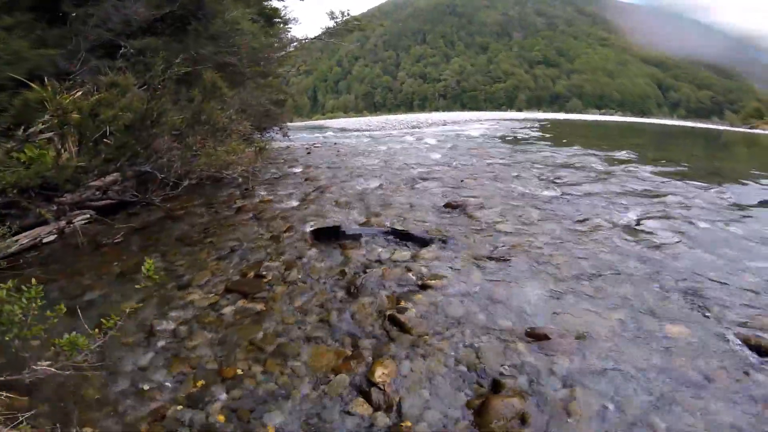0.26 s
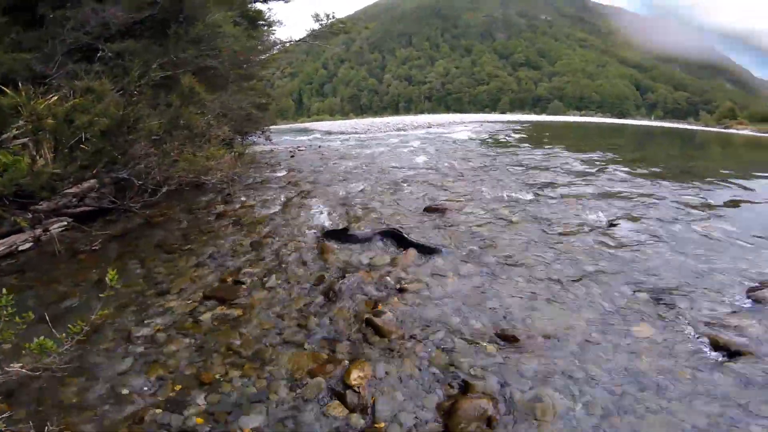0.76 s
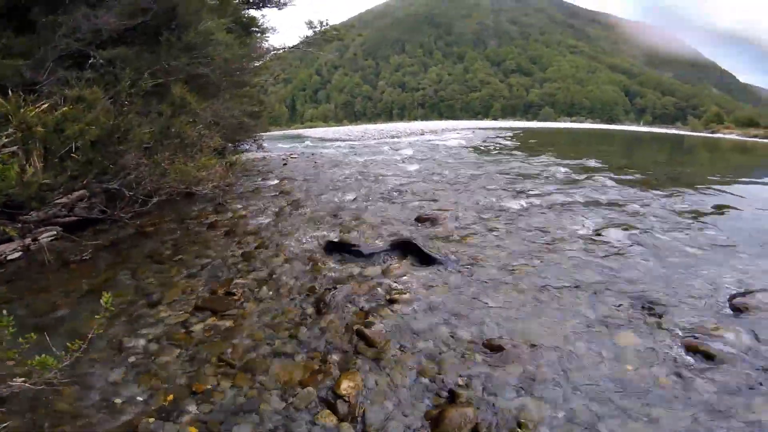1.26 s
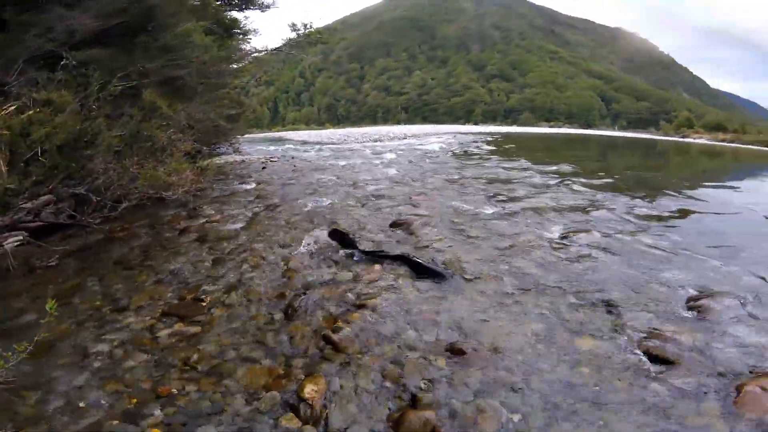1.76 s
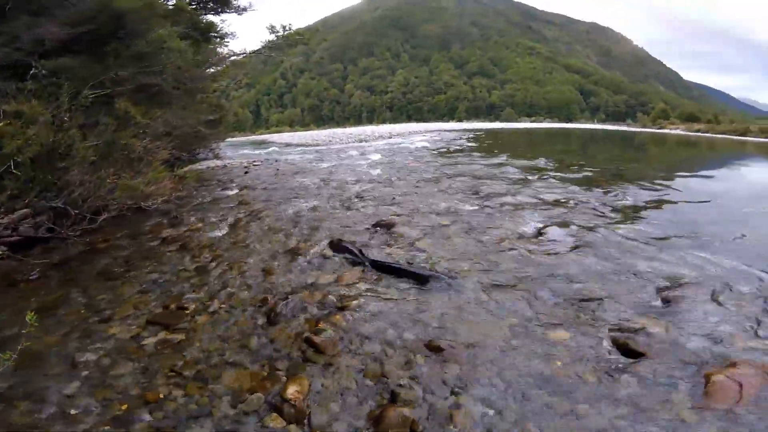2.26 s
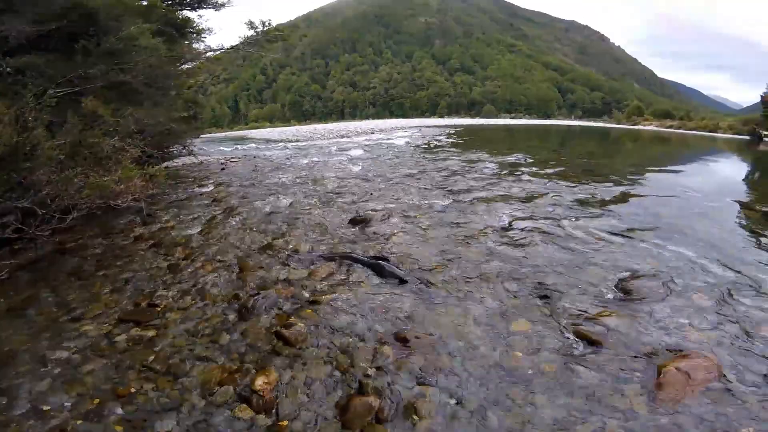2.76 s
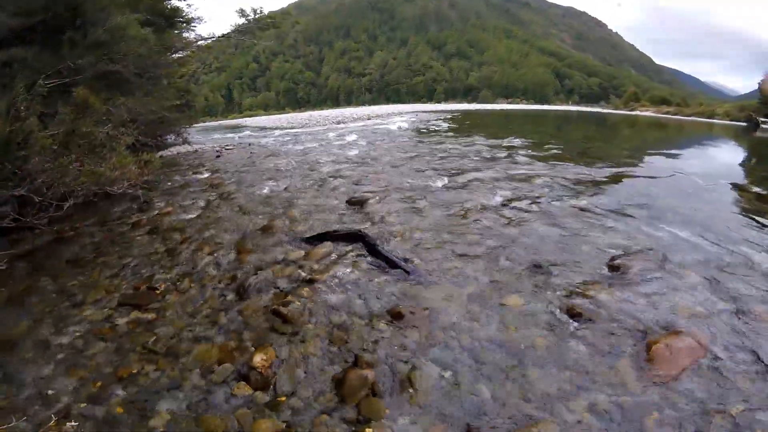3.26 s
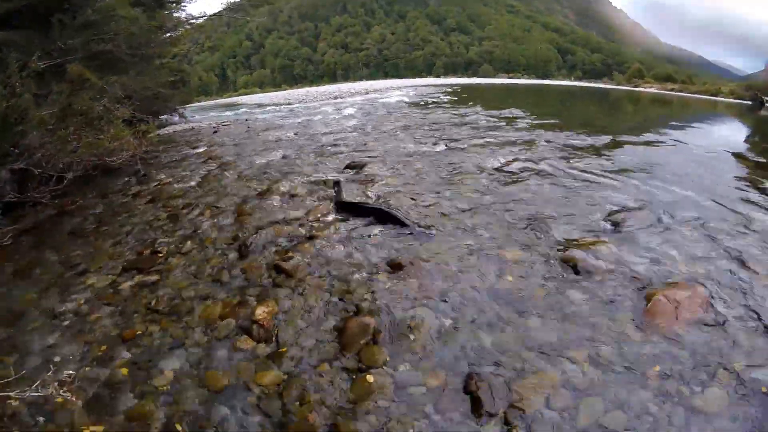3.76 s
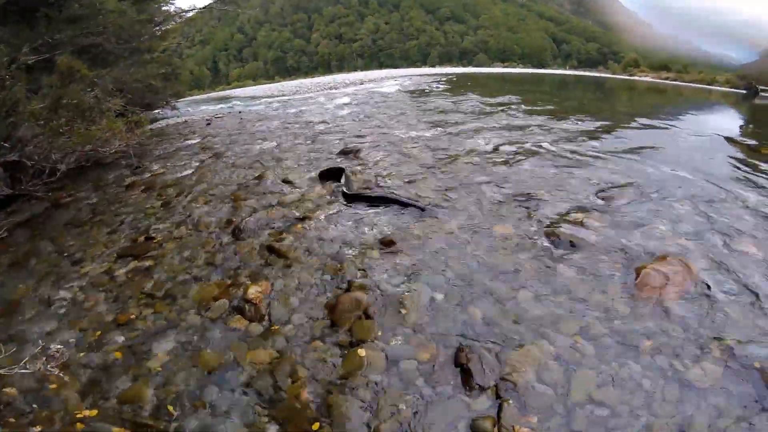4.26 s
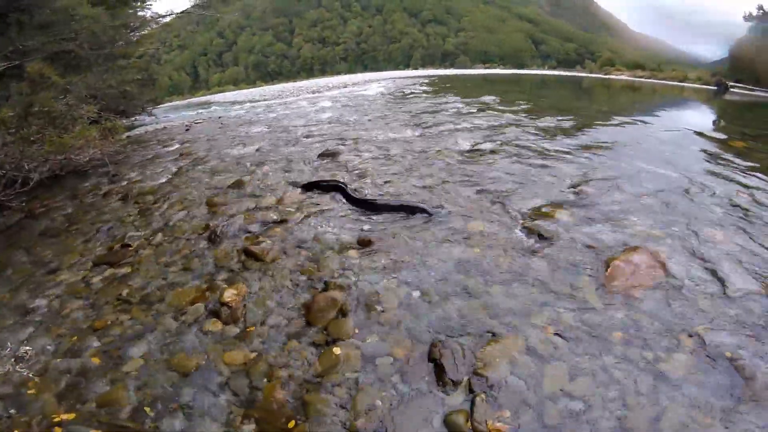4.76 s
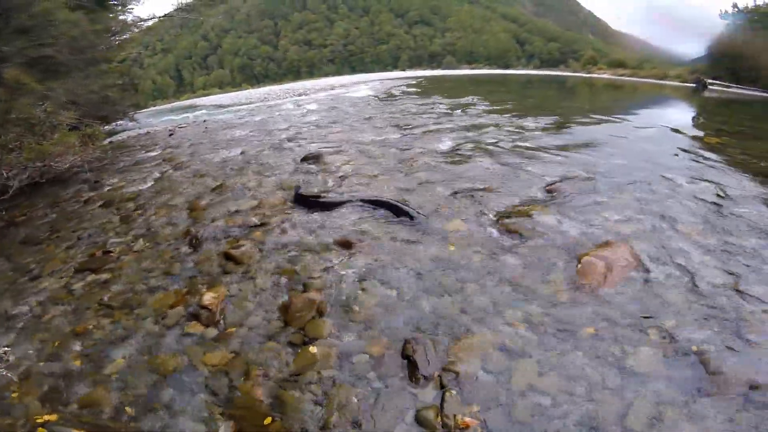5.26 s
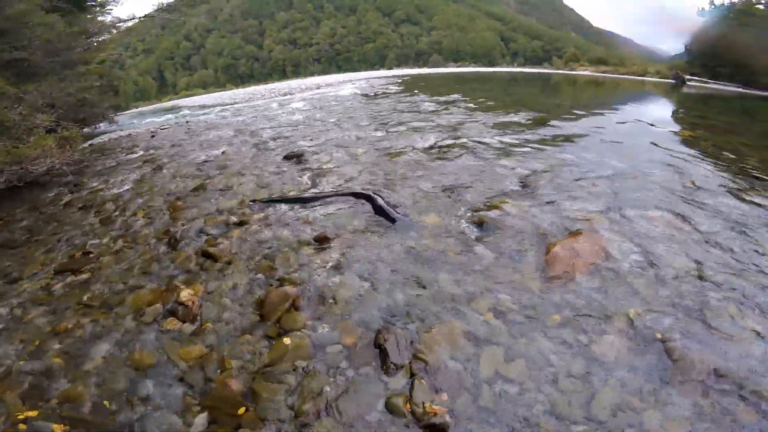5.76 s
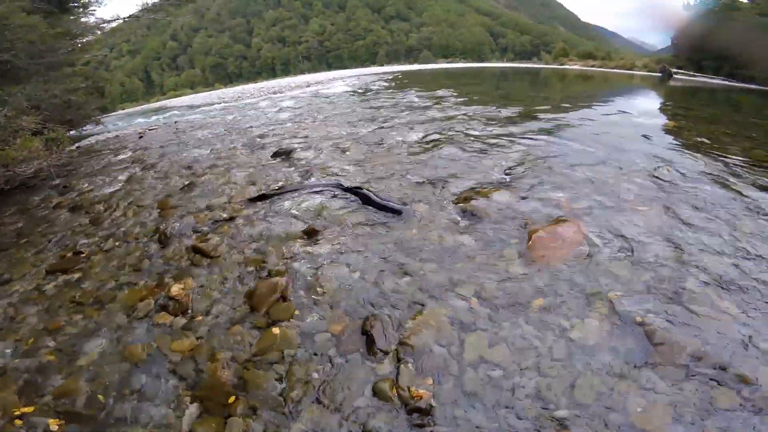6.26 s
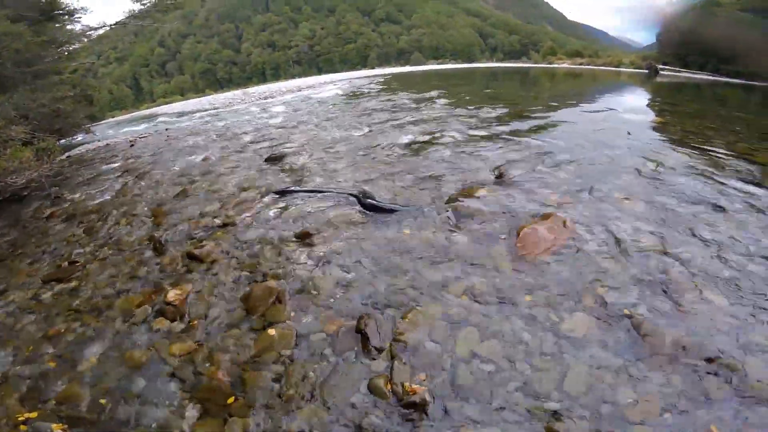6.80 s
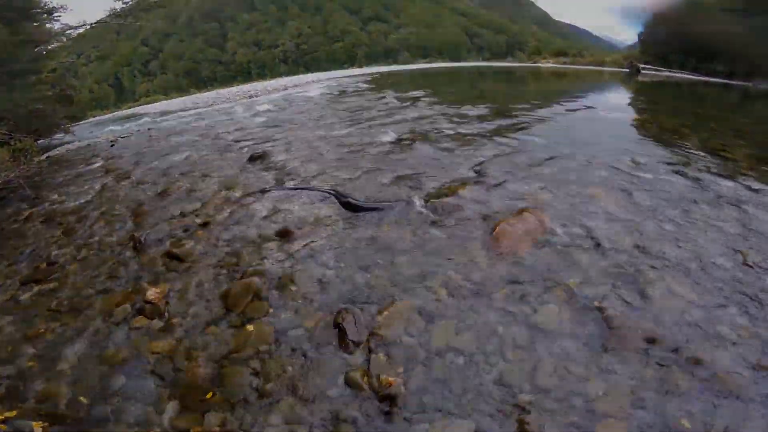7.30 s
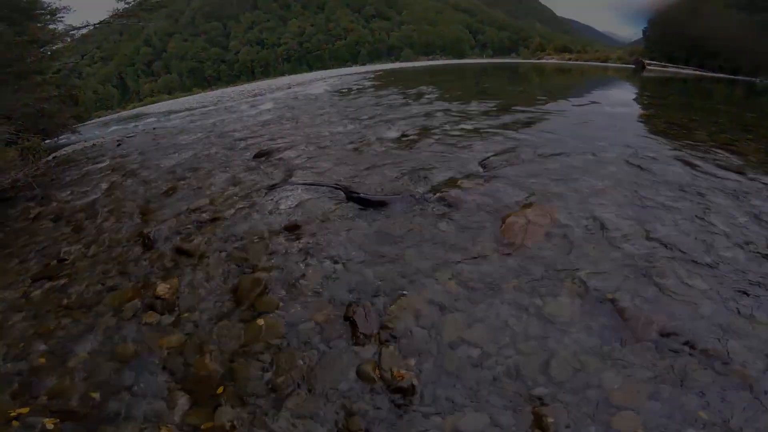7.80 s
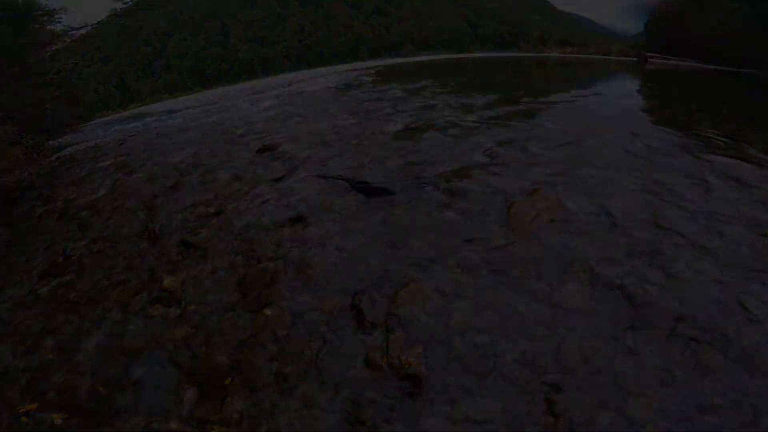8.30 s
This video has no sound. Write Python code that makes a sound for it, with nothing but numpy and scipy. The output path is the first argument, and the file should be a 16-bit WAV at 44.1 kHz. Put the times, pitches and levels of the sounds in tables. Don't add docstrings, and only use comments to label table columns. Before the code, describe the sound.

Muffled water gurgles and plops over pebbles with small clicks, while low bumps and rubs of a hand-held housing come and go before a fade-out.

```python
import sys
import numpy as np
from scipy import signal
from scipy.fft import rfft, irfft, next_fast_len
from scipy.io import wavfile
from scipy.ndimage import uniform_filter1d

SR = 44100
rng = np.random.default_rng(int(sys.argv[2]) if len(sys.argv) > 2 else 0)


def wav_record(signal):
    frames = np.transpose(np.atleast_2d(signal))
    bounded = np.clip(frames, -1, 1)
    quanta = np.round(bounded * 32767).astype(np.int16)
    wavfile.write(sys.argv[1], SR, quanta)


def volts_from_decibels(level):
    exponent = np.asarray(level, float) / 20
    return 10 ** exponent


N = 376613
TIME = np.arange(N) / SR
PAD = next_fast_len(N + SR)

# frequency in Hz, level in dB per Hz.
HOUSING = [(55, -31), (100, -21), (190, -11), (330, -7.5), (1100, -7), (1400, -6), (1760, -0.5), (1950, -4),
           (2300, -13.5), (2800, -19), (3350, -21), (3700, -33.5), (4090, -50.5), (6000, -100)]
# frequency in Hz, width in Hz.
BODY = [
    (28, 12.6),
    (62, 19),
    (123, 27),
]
FADE_FROM_S, FADE_TO_S = 6.885, 8.72


def rms_one(x):
    return x / np.sqrt(np.mean(x ** 2) + 1e-20)


def at_hz(points, hz):
    table_hz, table_db = np.array(points).T
    return np.interp(np.log(hz), np.log(table_hz), table_db)


def colour(x, spectrum):
    hz = np.arange(PAD // 2 + 1) * SR / PAD + 1
    cepstrum = irfft(np.log(volts_from_decibels(at_hz(spectrum, hz))), PAD)
    cepstrum[1:PAD // 2] *= 2
    cepstrum[PAD // 2 + 1:] = 0
    response = np.exp(rfft(cepstrum))
    return irfft(rfft(x, PAD) * response, PAD)[:N]


def drift(rate_hz):
    hop = 40
    r = np.exp(-2 * np.pi * rate_hz * hop / SR)
    noise = rng.standard_normal(N // hop + 2002)
    slow = signal.lfilter([1], [1, -2 * r, r * r], noise)[2000:]
    return np.interp(np.arange(N) / hop, np.arange(len(slow)), rms_one(slow))


def resonance(x, hz, width_hz):
    r = np.exp(-np.pi * width_hz / SR)
    return signal.lfilter([1, 0, -1], [1, -2 * r * np.cos(2 * np.pi * hz / SR), r * r], x + 1e-18)


def stream():
    # time in seconds, water level in dB.
    flow = [
        (0, -35),
        (1.2, -35.5),
        (2, -35),
        (4.2, -35.5),
        (4.7, -35),
        (5, -35.5),
        (5.9, -36),
        (6.9, -36),
        (8.54, -36),
    ]
    # middle in seconds, treble lift in dB.
    splashes = [
        (.12, 4.5),
        (.495, 1),
        (.63, 3),
        (.81, 4),
        (.9, 5),
        (1.94, 9.5),
        (4.73, -0.5),
        (7.37, -1),
    ]
    splash_s, bright_hz = 0.013, 2340
    bubble_share_db = -5
    water = rush(patchy_db=0.87, surge_db=0.21)
    water = water + volts_from_decibels(bubble_share_db) * bubbles(spread_db=1.5, clump_db=2.0)
    water = rms_one(colour(water, HOUSING))
    high_pass = signal.butter(2, bright_hz, "high", fs=SR, output="sos")
    treble = signal.sosfiltfilt(high_pass, water)
    bright_db = sum(lift_db * np.exp(-((TIME - s) / splash_s) ** 2) for s, lift_db in splashes)
    water_db = np.interp(TIME, *np.transpose(flow))
    return volts_from_decibels(water_db) * (water + treble * (volts_from_decibels(bright_db) - 1))


def rush(patchy_db, surge_db):
    out = 0
    surge = drift(5.0)
    edges = 60 * 2 ** (np.arange(20) / 3)
    white = rng.standard_normal((2, N))
    for k, (low, high) in enumerate(zip(edges, edges[1:])):
        band_pass = signal.butter(2, [low, high], "band", fs=SR, output="sos")
        band = signal.sosfilt(band_pass, white[k % 2])
        out = out + band * volts_from_decibels(surge_db * surge + patchy_db * drift(4.6))
    return rms_one(out)


def bubbles(spread_db, clump_db):
    births_per_s, ring_cycles = 900, 7.9
    sizes = volts_from_decibels(spread_db * np.minimum(rng.exponential(1, N), 4)) * rng.choice([-1, 1], N)
    born = rng.random(N) < births_per_s * volts_from_decibels(clump_db * drift(8.0)) / SR
    pitches = np.geomspace(280, 4200, 28)
    number = pitches ** 0.5
    dealt = rng.choice(28, N, p=number / np.sum(number))
    out = 0
    for k, hz in enumerate(pitches):
        ring = resonance(sizes * born * (dealt == k), hz, 1.95 * hz / ring_cycles)
        out = out + hz ** 0.79 * rms_one(ring) / np.sqrt(hz ** 0.5)
    return rms_one(out)


def plops():
    # start in seconds, peak behind the housing in dB, pitch in Hz.
    near = [(0.075, -21, 1900), (0.209, -33, 2760), (0.312, -26, 870), (0.317, -22, 1900),
            (0.431, -20, 1900), (0.671, -23, 1690), (0.689, -27, 1840), (0.73, -22, 1750),
            (0.767, -21, 1740), (0.941, -31, 454), (1.184, -25, 760), (1.888, -21, 1740),
            (1.813, -21.5, 1400), (1.996, -26, 690), (3.079, -34, 2620), (3.376, -23, 1610),
            (3.811, -23.5, 1600), (3.889, -33, 2370), (4.059, -28, 1180), (4.716, -22, 2150),
            (4.911, -21, 1890), (5.522, -31, 676), (6.005, -30.5, 376), (6.075, -20.5, 1725),
            (6.084, -26, 1350), (6.533, -24, 1880), (6.693, -24.5, 655), (6.774, -27, 1270),
            (7.161, -27, 1610), (7.412, -27, 473)]
    small_count, small_db, small_spread_db = 48, -22, 2.5
    small_low_hz, small_top_hz = 2305, 4030
    cycles, pitch_rise = 1.5, 0.033
    when, size, pitch = rng.random((small_count, 3)).T
    small_hz = small_low_hz + pitch * (small_top_hz - small_low_hz)
    small_peak_db = small_db + small_spread_db * (2 * size - 1) + at_hz(HOUSING, small_hz)
    small = zip(when * (N - 1) / SR, small_peak_db, small_hz)
    out, t = np.zeros(N + 2000), np.arange(2000) / SR
    for s, peak_db, hz in [*near, *small]:
        life = t / (0.0021 + cycles / hz / 2)
        tone = np.sin(2 * np.pi * hz * t * (1 + pitch_rise * (life / 2 - 1)))
        source_db = peak_db - at_hz(HOUSING, hz) - 5.0
        out[round(s * SR):][:2000] += volts_from_decibels(source_db) * life * np.exp(1 - life) * tone
    return colour(out[:N], HOUSING)


def ticks():
    # start in seconds, peak in dB, centre in Hz.
    clicks = [(.657, -20.5, 1800), (1.1835, -19.5, 1300), (1.949, -24, 2210), (1.974, -19.5, 1900),
              (2.061, -23, 1900), (3.046, -24, 1700), (3.262, -21, 1600), (6.06, -30, 1700),
              (6.379, -29, 1800), (6.693, -27, 780), (6.698, -23, 605)]
    out, impulse = np.zeros(N + 2000), np.arange(2000) == 0
    housing = colour(np.arange(N) == 0, HOUSING)[:2000]
    for s, peak_db, hz in clicks:
        strike = resonance(resonance(impulse, hz, 0.8 * hz), hz, 0.8 * hz)
        shape = signal.fftconvolve(housing, strike)[:2000]
        out[round(s * SR):][:2000] -= volts_from_decibels(peak_db) * shape / np.max(np.abs(shape))
    return out[:N]


def handling():
    slips_per_s = 35.0
    slips = (rng.random(N) < slips_per_s / SR) * rng.standard_normal(N)
    out = 0
    for (hz, width_hz), level in zip(BODY, hand_levels()):
        rub = rng.standard_normal(N) + volts_from_decibels(3.0) * rms_one(slips)
        ring = resonance(resonance(rub, hz, 1.12 * width_hz), hz, 1.12 * width_hz)
        ring = rms_one(ring)
        swing = np.sqrt(uniform_filter1d(ring ** 2, int(4.0 * SR / hz)) + 0.17)
        out = out + level * rms_one(ring / swing)
    return out


def hand_levels():
    # middle in seconds, length in seconds, peak in dB.
    sways = [(0, 0.04, -33), (0.177, 0.071, -40), (0.497, 0.24, -39.5), (.93, 0.17, -38.5),
             (1.3, 0.16, -38.5), (1.48, .08, -37), (1.698, .22, -44), (2, .15, -52), (2.2, 0.11, -38),
             (2.35, 0.07, -35.5), (2.533, .14, -41), (2.848, 0.3, -35.5), (3.144, 0.26, -49),
             (3.42, .2, -38.5), (3.78, 0.26, -38), (4.11, 0.063, -36), (4.31, 0.17, -36.5),
             (4.58, .12, -38), (4.82, 0.078, -38), (5.09, .14, -46), (5.29, 0.092, -41), (5.74, .2, -44),
             (5.94, .07, -41), (6.15, 0.12, -43), (6.38, 0.082, -38), (6.56, 0.22, -45), (6.853, 0.23, -44),
             (7.303, 0.37, -39.5), (7.898, 0.34, -41), (8.44, .1, -37)]
    # start in seconds, hold in seconds, level in dB, upper mode against it in dB.
    rubs = [(0, 0.03, -45, -22), (.23, 0.039, -51, -10), (.46, .07, -54.5, 0), (.88, .03, -60, 4),
            (1.27, .05, -40.5, -6.5), (1.42, 0.049, -34.5, -23), (1.57, 0.16, -45.5, -10),
            (2.06, 0.13, -36, -10), (2.29, 0.061, -46, -2.5), (2.67, 0.066, -38.5, -2.5),
            (2.8, 0.14, -39, -12), (3.02, 0.054, -37.5, -6.5), (3.27, 0.049, -53, 5.5),
            (3.38, 0.1, -41.5, -12), (3.6, 0.25, -46, -12), (3.98, 0.037, -48.5, -8), (4.17, 0.15, -50, -5),
            (4.63, .02, -37.5, -14), (4.85, 0.079, -51, -5), (5.2, .04, -58, 1), (5.44, .04, -59, -3),
            (6.13, 0.17, -52, -7.5), (6.36, 0.046, -48, -2), (6.7, 0.025, -44, -23), (6.84, 0.018, -46, -8),
            (7.02, 0.078, -54.5, 0), (7.23, 0.032, -49.5, 3.5), (7.7, .15, -56.5, -3),
            (8.48, 0.045, -44, 0)]
    rest = [
        -48.5,
        -57,
        -62.5,
    ]
    attack_db_per_s, release_db_per_s, rest_wander_db = 459, 192, 1.5
    t = np.arange(0, N + 64, 64) / SR
    sway = sum(volts_from_decibels(db) * np.exp(-(2 * (t - s) / length) ** 2) for s, length, db in sways)
    lower, upper = 0, 0
    for s, held, db, upper_db in rubs:
        rise_db = attack_db_per_s * np.maximum(s - t, 0)
        fall_db = release_db_per_s * np.maximum(t - s - held, 0)
        shape_db = db - rise_db - fall_db
        lower = lower + volts_from_decibels(shape_db)
        upper = upper + volts_from_decibels(shape_db + upper_db)
    levels = []
    for drive, rest_db in zip((sway, lower, upper), rest):
        still = volts_from_decibels(rest_db + rest_wander_db * drift(5.2))
        levels.append(np.hypot(np.interp(TIME, t, drive), still))
    return levels


def bumps():
    # start in seconds, peak in dB, upper mode share in dB.
    knocks = [(0.519, -32, -11), (1.288, -43, -9), (1.429, -26, -13), (1.57, -35, -5), (2.063, -30, -2),
              (2.27, -34, -15), (2.679, -30, -10), (2.811, -35, -5), (2.95, -25.5, -13), (3.028, -32, -2),
              (3.381, -34, -8), (4.34, -42, 3), (4.616, -36, -4), (7.009, -42, 4), (7.236, -44, -2)]
    s, peak_db, upper_db = np.transpose(knocks)
    push = signal.butter(2, 220.0, fs=SR, output="sos")
    out = 0
    for (hz, width_hz), share_db in zip(BODY[1:], (0 * s - 6.0, upper_db)):
        clicks = np.zeros(N)
        clicks[np.round(s * SR).astype(int)] = volts_from_decibels(peak_db + share_db) * SR / (4 * np.pi * hz)
        ring = resonance(signal.sosfilt(push, clicks), hz, 0.56 * width_hz)
        out = out + 2 * np.pi * hz / SR * ring
    return out


def hiss():
    # frequency in Hz, level in dB per Hz.
    port = [(3300, -52.5), (4090, -32), (4200, -14), (4600, -16.5), (5900, -12.5), (6250, -8.5), (6470, -1),
            (7000, -7.5), (9000, -10), (9800, -13), (10400, -16.5), (11500, -14), (12800, -17.5),
            (14200, -28)]
    return volts_from_decibels(-64.3) * rms_one(colour(rng.standard_normal(N), port))


def fade(s):
    return np.clip((FADE_TO_S - s) / (FADE_TO_S - FADE_FROM_S), 1e-3, 1)


def line_gate(x):
    # frequency in Hz, threshold over the usual level in dB.
    threshold = [(3500, -32), (3850, 3.5), (4100, 1.5), (4500, 3.5), (5200, 2), (6000, 1.5), (6350, -8),
                 (7500, -5.5), (8500, -0.5), (9500, 1.5), (10400, 3), (11500, 2.5), (13000, 2.5),
                 (14200, 2)]
    # fade in dB, limit in Hz.
    top_steps = [
        (-2.2, 13700),
        (-7, 12900),
    ]
    # start in seconds, end in seconds.
    drops = [
        (5.1, 5.33),
        (5.5, 5.7),
        (5.68, 5.3),
        (6.11, 6.3),
        (6.2, 5.8),
        (6.478, 6.95),
        (7.203, 6.5),
        (7.451, 7.7),
    ]
    drop_low_hz, drop_top_hz = 4020, 4480
    flicker_db, follows_fade = -0.5, 0.97
    frame = dict(fs=SR, window="cosine", nperseg=2048, noverlap=1024)
    hz, s, lines = signal.stft(x, **frame)
    before_fade = lines[:, s < 6]
    usual = np.sqrt(np.mean(np.abs(before_fade) ** 2, axis=1, keepdims=True))
    fade_db = 20 * np.log10(fade(s))
    flicker = np.repeat(rng.standard_normal((65, len(s))), 16, axis=0)[:len(hz)]
    limit_db = at_hz(threshold, hz + 1)[:, None] + flicker_db * flicker + follows_fade * fade_db
    keep = np.abs(lines) > usual * volts_from_decibels(limit_db)
    for below_db, top_hz in top_steps:
        keep[np.ix_(hz > top_hz, fade_db < below_db)] = False
    quiet_band = (hz > drop_low_hz) & (hz < drop_top_hz)
    for start_s, end_s in drops:
        keep[np.ix_(quiet_band, (s > start_s) & (s < end_s))] = False
    ungated = hz[:, None] < threshold[0][0]
    return signal.istft(lines * (keep | ungated), **frame)[1][:N]


def scene():
    return (stream() + plops() + ticks() + handling() + bumps() + hiss())[None]


def top_cut(x):
    return signal.sosfilt(signal.butter(12, 14260, fs=SR, output="sos"), x)


def record(dry):
    faded = dry[0] * fade(TIME)
    mix = line_gate(faded)[None]
    return top_cut(mix)


dry = scene()
out = record(dry)
wav_record(out)
```